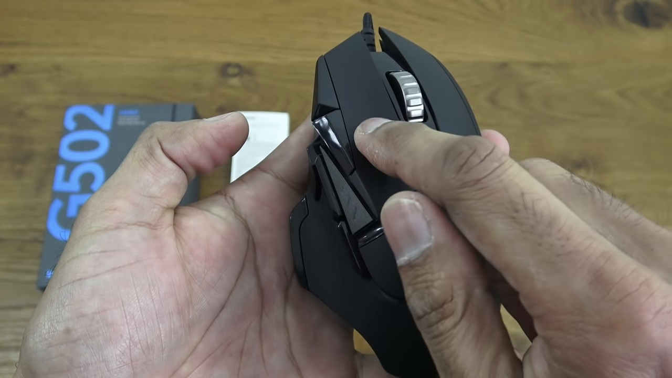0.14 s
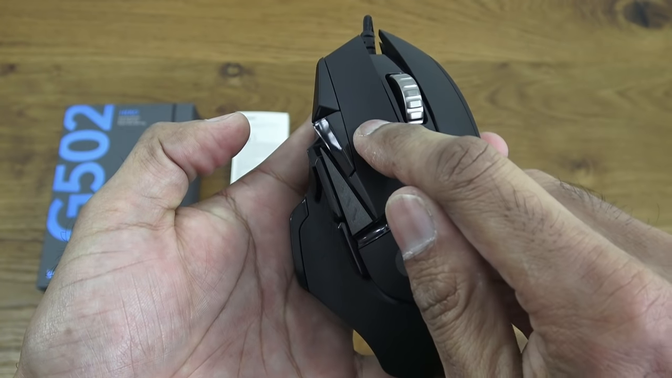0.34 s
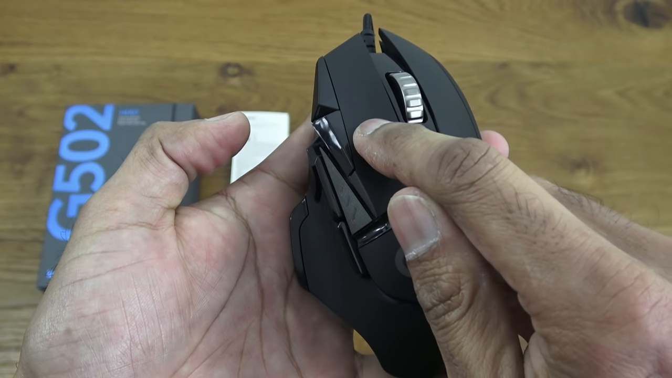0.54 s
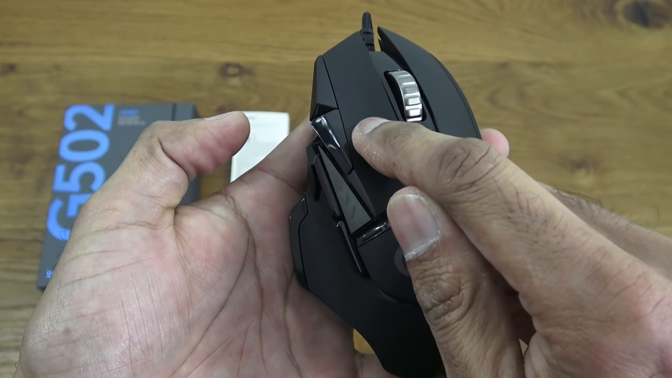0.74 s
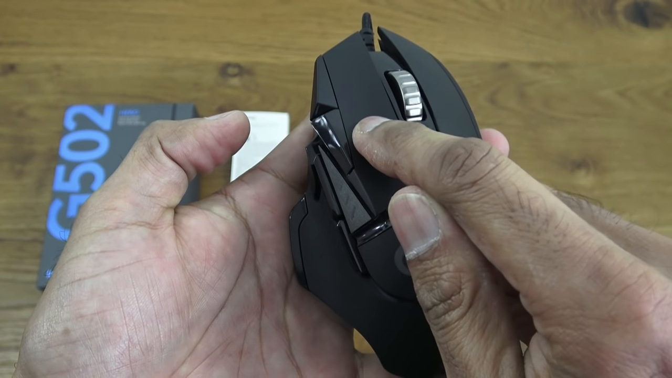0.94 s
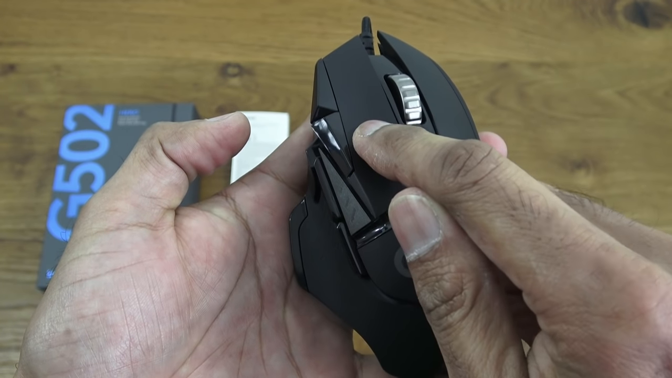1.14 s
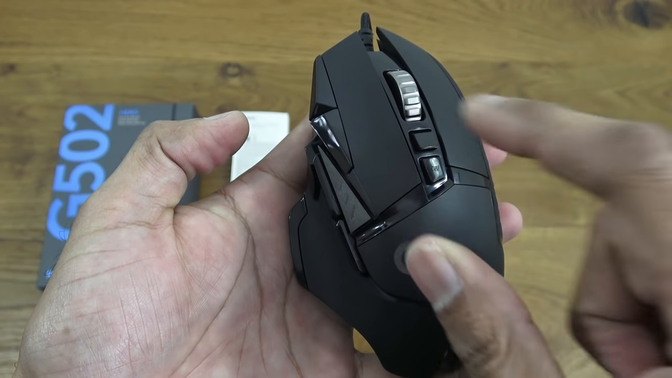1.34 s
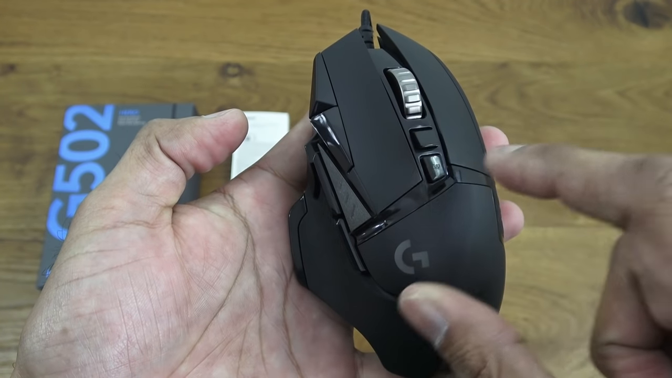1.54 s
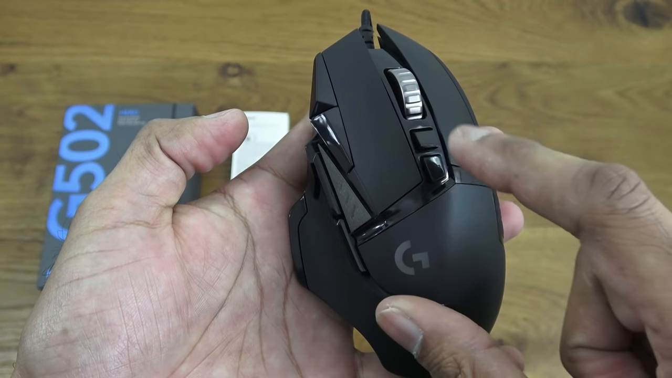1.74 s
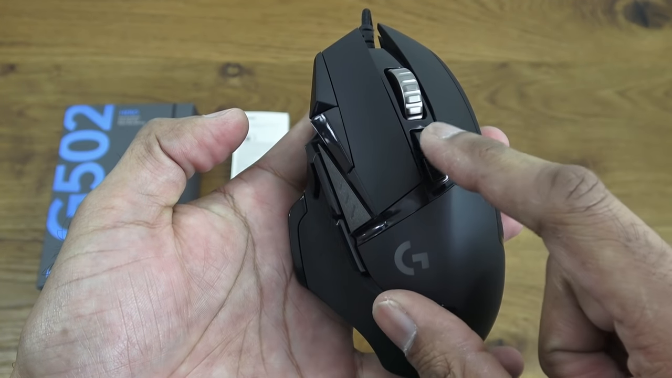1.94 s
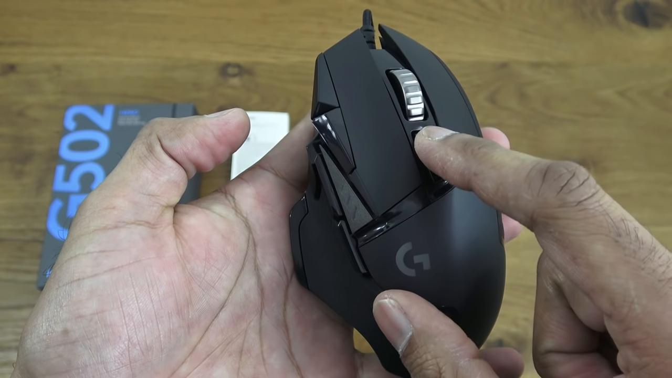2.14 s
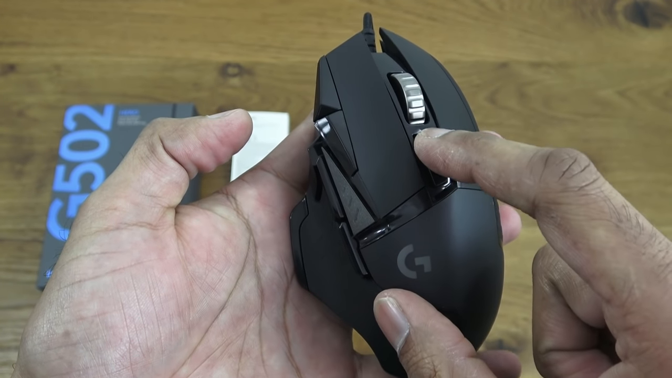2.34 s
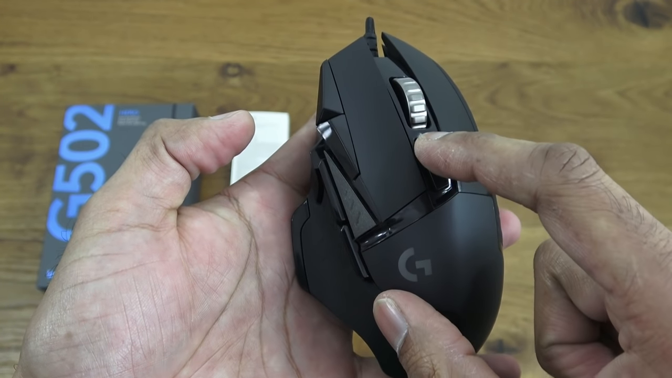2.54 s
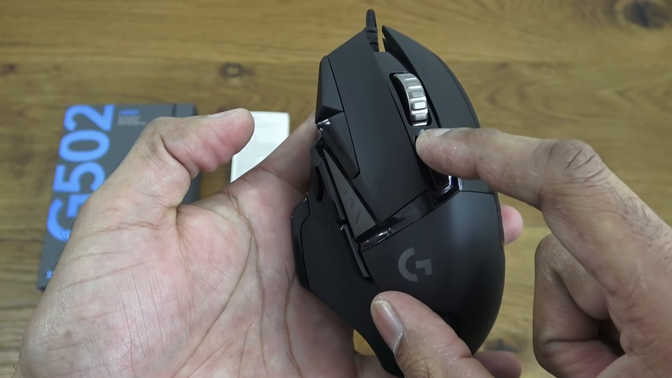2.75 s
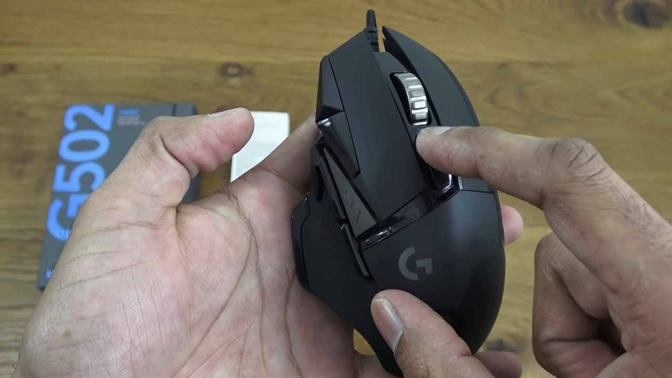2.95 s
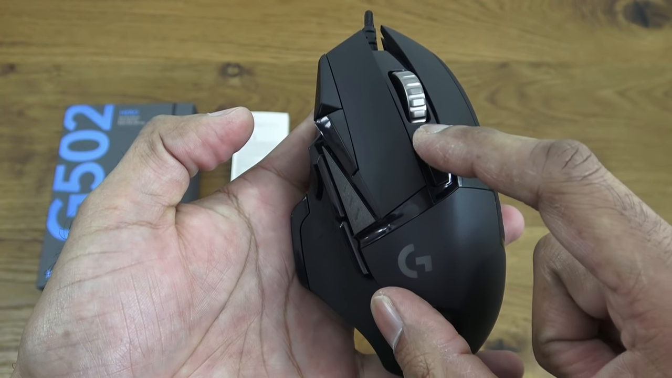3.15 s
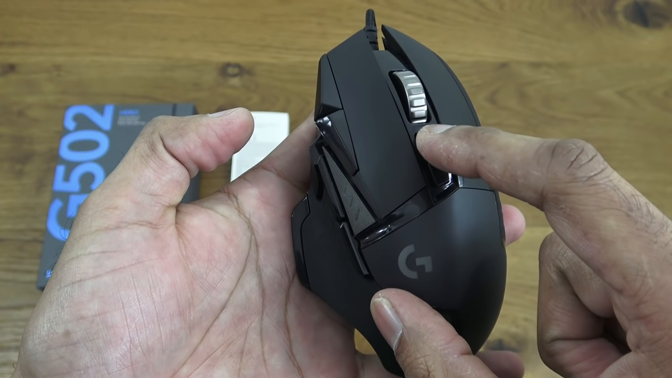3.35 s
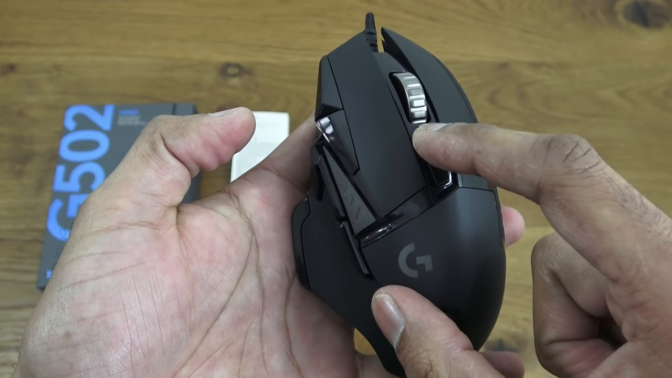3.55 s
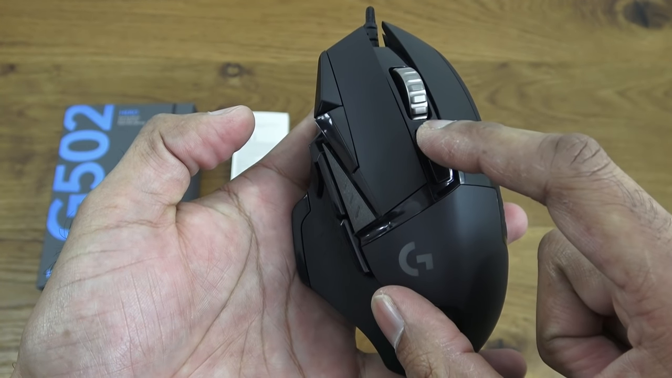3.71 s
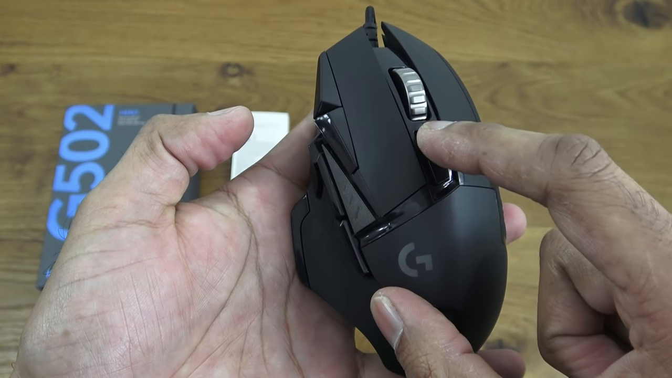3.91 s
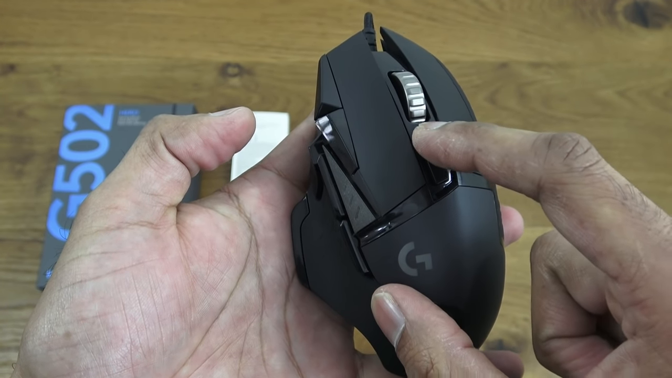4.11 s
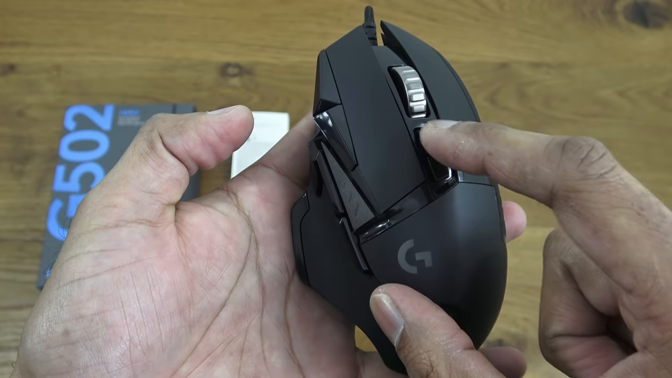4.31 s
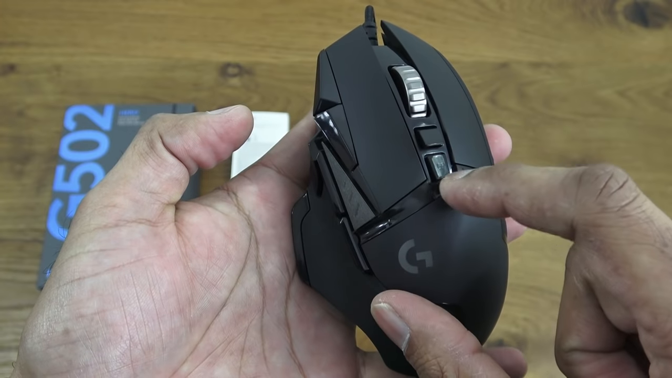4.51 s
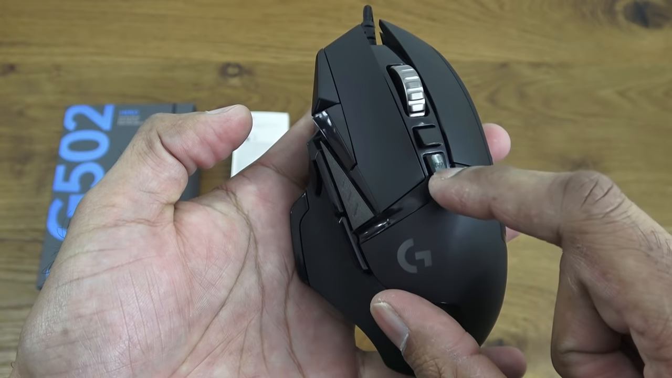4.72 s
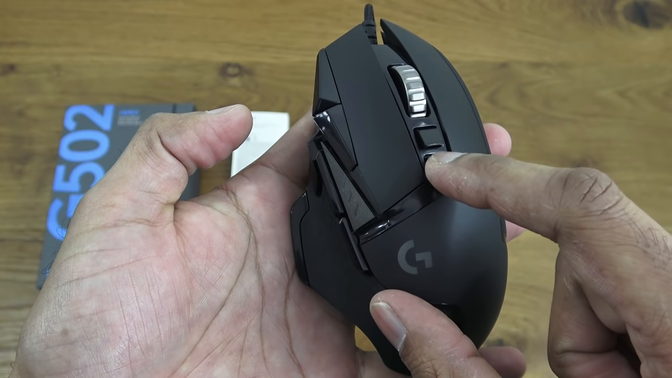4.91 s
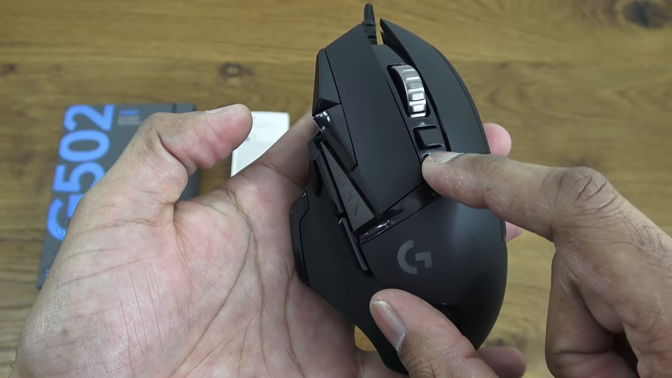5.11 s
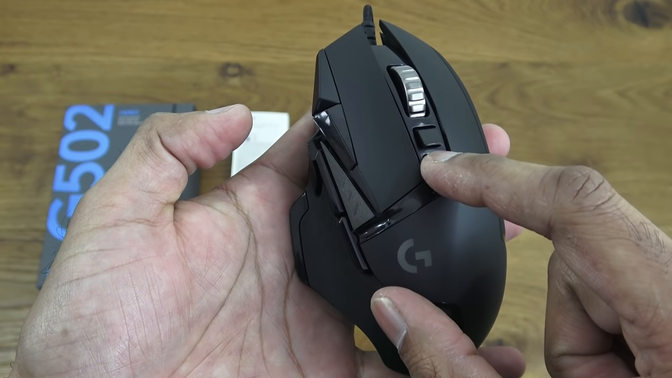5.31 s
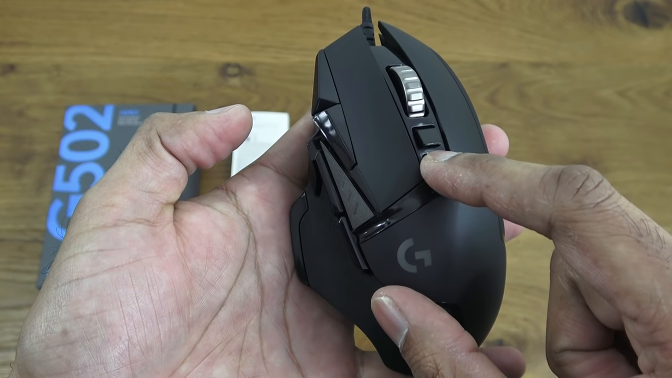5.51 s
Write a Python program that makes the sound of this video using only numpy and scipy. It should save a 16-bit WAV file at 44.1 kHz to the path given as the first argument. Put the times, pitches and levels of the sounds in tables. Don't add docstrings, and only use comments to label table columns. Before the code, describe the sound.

Close, dry mouse clicks: four quick bright double ticks, a pause, then spaced louder plastic clacks with low hollow ring, and a final light click.

```python
import sys
import numpy as np
from scipy import signal
from scipy.fft import rfft, irfft
from scipy.io import wavfile
from scipy.ndimage import uniform_filter1d

SR = 44100
rng = np.random.default_rng(int(sys.argv[2]) if len(sys.argv) > 2 else 0)


def makeup_ratio(level_db):
    decades = np.asarray(level_db, float) / 20
    return 10 ** decades


def wav_record(signal):
    frames = np.transpose(np.atleast_2d(signal))
    bounded = np.clip(frames, -1, 1)
    quanta = np.round(bounded * 32767).astype(np.int16)
    wavfile.write(sys.argv[1], SR, quanta)


N = 245637

# start_s, snap_db, shell_knock_db (re snap)
SIDE_DOWN = [
    (0.3064, -23.5, -41),
    (0.5673, -22, -40),
    (0.8062, -23, -37),
    (1.0251, -22, -41.5),
]
# start_s, snap_db, shell_knock_db (re snap)
SIDE_UP = [
    (0.4178, -18.5, -45),
    (0.6646, -17, -46),
    (0.8926, -17.5, -42.5),
    (1.1195, -18, -41.5),
]
# start_s, snap_db, shell_knock_db (re snap)
LAST_SWITCH = [
    (5.2936, -25, -26),
]
# start_s, snap_db, shell_hz, shell_db (re snap), overtone_db (re snap)
CATCH = [
    (2.4593, -11, 1116, -5, -19),
    (3.0211, -12.5, 1086, -9, -15),
    (4.0659, -11.5, 1101, -8, -14.5),
]
# start_s, snap_db, shell_hz, shell_db (re snap), overtone_db (re snap)
SPRING = [
    (3.2130, -6.5, 1169, -17, -29),
]
# start_s, snap_db, shell_hz, shell_db (re snap), overtone_db (re snap)
KICK = [
    (4.2680, -8.5, 1268, -13.5, -29),
]
# start_s, snap_db, shell_hz, shell_db (re snap), overtone_db (re snap)
PUSH = [
    (3.483, -11.5, 1080, -6, -22.5),
]
# start_s, snap_db, shell_hz, shell_db (re snap), overtone_db (re snap)
PRESS = [
    (3.8359, -15, 1132, -5.5, -20.5),
]
# start_s, snap_db, shell_hz, shell_db (re snap), overtone_db (re snap)
LIFT = [
    (2.8443, -15.5, 1142, -14, -16),
]
# start_s, snap_db, shell_db (re snap), overtone_db (re snap), crackle_hz
SLACK = [
    (2.599, -48.5, -4, -30.5, 4550),
    (2.8047, -46.5, -8.5, -29, 5700),
    (2.821, -60.5, 6, -8, 2400),
    (2.831, -49.5, -1, -10.5, 5500),
    (2.9587, -32.5, 3, -19, 4900),
    (3.381, -47.5, -4, -12.5, 10500),
    (3.630, -54, 14, -18.5, 4000),
    (3.6414, -40.5, -3, -10.5, 5030),
    (3.7085, -51, -10, -14, 5640),
    (4.013, -36, 3, -14, 4700),
]


def evened(x):
    return x / np.sqrt(np.mean(x ** 2) + 1e-20)


def read(points, hz):
    point_hz, value = np.transpose(points)
    return np.interp(np.log(hz + 1), np.log(point_hz + 1), value)


def add(mix, start_s, sound):
    part = mix[..., round(start_s * SR):][..., :sound.shape[-1]]
    part += sound[..., :part.shape[-1]]


def ring(x, modes, bare_db, tilt_db=0):
    f = np.fft.rfftfreq(len(x), 1 / SR)
    response = makeup_ratio(bare_db) + 0j
    for k, (hz, width_hz, db) in enumerate(modes):
        response = response + (-1) ** k * makeup_ratio(db) / (1 + 2j * (f - hz) / max(width_hz, 130))
    tilt = makeup_ratio(tilt_db * np.log2((f + 2000) / 9000))
    low_cut = (1j * f / (2200 + 1j * f)) ** 2
    return irfft(rfft(x) * response * tilt * low_cut, len(x))


def snap(db, modes, bare_db, crack_s, rattle_db, rattle_s, tilt_db=0):
    t = np.arange(4096) / SR
    shape = np.exp(-(t / crack_s) ** 2) + makeup_ratio(rattle_db - 60 * t / rattle_s)
    shape *= np.minimum(t / 0.00037, 1)
    energy = np.linalg.norm(shape)
    chatter = rfft(rng.standard_normal(len(t)) * shape)
    chatter /= np.sqrt(uniform_filter1d(abs(chatter) ** 2, size=50))
    chatter = irfft(chatter) * (t < .07)
    sound = ring(chatter * energy / np.linalg.norm(chatter), modes, bare_db, tilt_db)
    spread = ring(energy * (t == 0), modes, bare_db, tilt_db)
    peak = np.sqrt(uniform_filter1d(sound ** 2, size=64).max())
    return makeup_ratio(db - 8.5) * np.array([sound, sound, spread]) / peak


def mode(hz, db, t60_s, rise_s):
    t = np.arange(8192) / SR
    swell = 1 - np.exp(-(t / rise_s) ** 2)
    return makeup_ratio(db - 60 * t / t60_s) * swell * np.sin(2 * np.pi * (hz * t + rng.random()))


def shell(hz, db, over_db, side_db=0):
    # pitch_hz, level_db, t60_s
    neighbours = [(1373, -2.5, 0.02), (1505, -16.5, 0.051), (924, -16, .04), (773, -16, 0.013),
                  (1838, -13, 0.016)]
    body = mode(hz, db + 10.5, 0.016, .0028)
    for side_hz, level_db, t60_s in neighbours:
        body = body + mode(side_hz, db + level_db + side_db, t60_s, 0.0016)
    thump = mode(300, db - 20.5, 0.015, 0.001465)
    over = mode(2228, over_db + 7.0, 0.036, 0.0012) + mode(2810, over_db + 0.5, 0.0087, 0.00033)
    return (body + thump) * makeup_ratio([[0], [-9.], [-5.5]]) + over * makeup_ratio([[0], [-10], [-10]])


def noise_floor():
    # pitch_hz, level_db
    floor_colour = [(12, -9.5), (40, -12), (107, -23), (345, -25), (1100, -30.5), (2700, -37), (7400, -37),
                    (15900, -41.5)]
    # pitch_hz, width_hz, level_db
    humps = [(20, 9, -7), (70, 25.2, -9.5), (195, 33.6, -16.5), (312.6, 25, -26)]
    frames, hz = N // 512 + 5, np.fft.rfftfreq(2048, 1 / SR)
    a, b = rng.standard_normal((frames, len(hz), 2)).T
    lumps = evened(uniform_filter1d(rng.standard_normal(frames), 8))
    colour = makeup_ratio(read(floor_colour, hz))
    for hump_hz, width_hz, db in humps:
        colour = colour + makeup_ratio(db) * np.exp(-((hz - hump_hz) / width_hz) ** 2)
    heave = makeup_ratio(4.8 * lumps / (1 + (hz[:, None] / 45) ** 2))
    z = (a + 1j * b) * colour[:, None] * heave
    floor_db = -59
    return makeup_ratio(floor_db) * evened(signal.istft(z, nperseg=2048, noverlap=1536)[1][:N])


def finger_slide():
    # start_s, length_s, peak_db
    strokes = [
        (0.0, .16, -75),
        (1.198, 0.066, -65),
        (1.228, 0.35, -66.5),
    ]
    fastest = 0.29
    out = np.zeros(N)
    for start_s, length_s, db in strokes:
        u = np.arange(0, length_s, 1 / SR) / length_s
        bursts = makeup_ratio(2.0 * np.minimum(rng.exponential(1, len(u)), 4))
        grains = rng.standard_normal(len(u)) * bursts
        hiss = evened(ring(grains, [(10140, 3200, 0.01)], -15))
        speed = np.sin(np.pi / 2 * np.interp(u, [0, fastest, 1], [0, 1, 0]))
        add(out, start_s, makeup_ratio(db) * hiss * speed)
    return out


def soft_touches():
    # start_s, snap_db, shell_db (re snap), overtone_db (re snap), crackle_hz
    landing = [
        (.2865, -46.5, -2, -13, 2520),
    ]
    # start_s, snap_db, shell_db (re snap), overtone_db (re snap), crackle_hz
    taps = [
        (.3002, -42, -28, -38, 11000),
        (1.1965, -57, -4.5, -8, 2500),
        (1.485, -55, -17, -20, 8000),
        (4.334, -37, 3, -2, 2800),
    ]
    # pitch_hz, width_hz, level_db
    landing_ring = [(2520, 320, 4), (10500, 2100, -7)]
    # (touches, main shell pitch Hz, side modes dB)
    for_each = [(landing, 400, -15), (taps, 990, -3), (SLACK, 1030, 4)]
    out = np.zeros((3, N))
    for rows, hz, side_db in for_each:
        for start_s, db, shell_db, over_db, crackle_hz in rows:
            bare_db = -17 + .45 * (db + 42) + (crackle_hz - 5000) / 500
            modes = landing_ring if rows is landing else [(crackle_hz, 1100, 0)]
            add(out, start_s, snap(db, modes, min(bare_db, -8), 0.0011, -7, .035))
            add(out, start_s, shell(hz, db + shell_db, db + over_db, side_db))
    for start_s, db, shell_db, *_ in taps:
        add(out[0], start_s, mode(906, db + shell_db - 2.5, 0.19, 0.0013))
    return out


def switches():
    # pitch_hz, width_hz, level_db
    down_ring = [(4090, 320, -9), (5440, 220, -6.5), (5800, 250, -4), (6200, 830, -7.5), (9130, 400, 4.5),
                 (9880, 310, 6), (10400, 320, 6.5), (11400, 300, -1), (13300, 610, -9)]
    # pitch_hz, width_hz, level_db
    up_ring = [(3520, 370, 2), (3800, 380, 5), (6400, 170, 7.5), (8300, 160, -5), (9890, 670, 17.5),
               (10690, 240, 13.5), (10680, 300, 9.5), (12400, 250, 2), (13700, 570, -6)]
    # pitch_hz, width_hz, level_db
    last_ring = [(3810, 280, -4.5), (6900, 300, 2), (8220, 220, 6), (11000, 340, 9), (12900, 300, 0)]
    # (ticks, ringing, bare dB, crack s, rattle dB)
    kinds = [(SIDE_DOWN, down_ring, -24, .0012, -9),
             (SIDE_UP, up_ring, -24, .001, -9),
             (LAST_SWITCH, last_ring, -11, .0012, -12)]
    out = np.zeros((3, N))
    for rows, modes, bare_db, crack_s, rattle_db in kinds:
        for start_s, db, knock_db in rows:
            add(out, start_s - .0004, snap(db, modes, bare_db, crack_s, rattle_db, 0.034))
            add(out, start_s - .0004, shell(1073, db + knock_db + 5.0, db + knock_db - 7.5))
    return out


def wheel_latch():
    # pitch_hz, width_hz, level_db
    catch_ring = [(2840, 520, -6), (3800, 450, -3.5), (6040, 560, -4.5), (7770, 590, -2), (9470, 950, -8),
                  (12500, 770, -8.5)]
    # pitch_hz, width_hz, level_db
    spring_ring = [(3200, 2300, -17.5), (5225, 320, -1), (7490, 1200, -1), (8500, 1000, 2),
                   (10500, 900, -0.5), (12200, 1600, -1.5), (13600, 890, -4)]
    # pitch_hz, width_hz, level_db
    kick_ring = [(2860, 700, -6.5), (4375, 380, -1.5), (5700, 660, 1), (8000, 500, 2), (10320, 720, 0.5),
                 (11700, 500, 3.5), (12300, 1200, -3), (14500, 1800, -4.5)]
    # pitch_hz, width_hz, level_db
    push_ring = [(3500, 5400, -6.5), (5450, 240, 2), (6740, 650, -6.5), (8500, 380, 4), (9700, 1120, -7),
                 (12840, 930, -2)]
    # pitch_hz, width_hz, level_db
    press_ring = [(2930, 450, -11), (4700, 170, 2), (6320, 390, -8.5), (7930, 430, 2), (10100, 800, -6.5),
                  (12500, 1200, -8.5)]
    # pitch_hz, width_hz, level_db
    lift_ring = [(3560, 1600, -16), (4840, 1400, -1.5), (6260, 200, 13), (8220, 1200, 2), (10500, 900, 3.5),
                 (12300, 2400, -1)]
    creep_s, creep_db = 0.0014, -16
    catch_dulling, even_overtone_db = -1.5, -16.5
    # (strokes, ringing, bare dB, crack s, rattle dB, side modes dB, dulling)
    kinds = [(CATCH, catch_ring, -14, .0012, -16, -1.5, catch_dulling),
             (SPRING, spring_ring, -14, .0012, -14, 2.5, 0),
             (KICK, kick_ring, -14, .0011, -15, 3, 0),
             (PUSH, push_ring, -14, .0012, -16, -4, 0),
             (PRESS, press_ring, -14, .0012, -16, -1.5, 0),
             (LIFT, lift_ring, -16, .0012, -15, 5, 0)]
    out = np.zeros((3, N))
    for rows, modes, bare_db, crack_s, rattle_db, side_db, dulling in kinds:
        for start_s, db, hz, shell_db, over_db in rows:
            tilt_db = dulling * (over_db - even_overtone_db)
            add(out, start_s - creep_s, snap(db + creep_db, modes, bare_db, creep_s, -26, .01))
            add(out, start_s - .0003, snap(db, modes, bare_db, crack_s, rattle_db, 0.018, tilt_db))
            add(out, start_s - .0003, shell(hz, db + shell_db + 3.5, db + over_db, side_db))
    return out


def room(near, far):
    # delay_s, level_db
    echo_rows = [(.0012, -7.5), (.0035, -7), (.006, -11), (.009, -19.5), (.0125, -16), (.019, -27)]
    # pitch_hz, t60_s
    decay = [(300, 0.36), (1000, 0.36), (2500, 0.44), (6000, 0.28), (10000, 0.31), (15000, 0.15)]
    echoes = np.zeros(SR // 20)
    for k, (delay_s, db) in enumerate(echo_rows):
        add(echoes, delay_s, (-1) ** k * makeup_ratio([db]))
    out = signal.fftconvolve(near, echoes)[:N]
    for place in range(3):
        reflections = np.zeros(SR // 2)
        at = np.arange(300, len(reflections) - 20, 20)
        reflections[at + rng.integers(0, 20, len(at))] = rng.choice([-1., 1.], len(at))
        hz, t, z = signal.stft(reflections, SR, nperseg=256)
        fade = makeup_ratio(-60 * t / read(decay, hz)[:, None])
        tail = signal.istft(z * fade, SR, nperseg=256)[1]
        share = np.sqrt(2 / 3) * np.cos(2 * np.pi * (np.arange(N) / SR * 1.3 + place / 3))
        out += makeup_ratio(-6.5) * signal.fftconvolve(far * share, tail / np.linalg.norm(tail))[:N]
    return out


def scene():
    direct, near, far = finger_slide() + soft_touches() + switches() + wheel_latch()
    return (direct + room(near, far) + noise_floor())[None]


def starve(x):
    frame_s, block_s, grid_s = 1024 / 48000, 128 / 48000, .008
    hz, t, z = signal.stft(x, SR, nperseg=128, noverlap=96)
    power = uniform_filter1d(abs(z) ** 2, size=5, axis=0)
    level_db = 10 * np.log10(uniform_filter1d(power, size=3, axis=1) + 1e-16)
    scatter = np.exp(2j * np.pi * rng.random(z.shape))
    sudden = np.zeros(N)
    strokes = SIDE_DOWN + SIDE_UP + LAST_SWITCH + CATCH + SPRING + KICK + PUSH + PRESS + LIFT + SLACK
    for start_s, db, *_ in strokes:
        if db <= -37:
            continue
        frame = grid_s + (start_s - .0006 - grid_s) // frame_s * frame_s
        block = grid_s + (start_s - .0026 - grid_s) // block_s * block_s
        threshold_db = -72 + .4 * db + 3.5 * np.log2(hz[:, None] / 2500 + .1)
        before = (t > frame) & (t < block + .001)
        faint = (level_db < threshold_db) & (hz[:, None] > 700) & before
        attack = abs(z[:, (t > start_s) & (t < start_s + .003)]).mean(1, keepdims=True)
        smear = makeup_ratio(-26.5) * attack * scatter * ((t > block + .001) & (t < start_s))
        z = np.where(faint, z / 1000, z) + smear
        add(sudden, block, np.ones(round(4 * block_s * SR)))
    x = signal.istft(z, SR, nperseg=128, noverlap=96)[1][:N]
    sudden = x * uniform_filter1d(np.minimum(sudden, 1), size=128)
    steady_top_hz = 15900
    top_cut = np.clip((steady_top_hz + 100 - np.fft.rfftfreq(N, 1 / SR)) / 200, 0, 1)
    return sudden + irfft(rfft(x - sudden) * top_cut, N)


def roll_off(x):
    return signal.sosfilt(signal.butter(12, 17000, fs=SR, output="sos"), x)


def record(dry):
    # pitch_hz, level_db
    mic = [(12000, 1.39), (14000, -0.5), (15800, -5), (16400, -18.5), (16900, -50)]
    hz = np.fft.rfftfreq(N, 1 / SR)
    heard = irfft(rfft(dry[0]) * makeup_ratio(read(mic, hz)), N)
    mix = starve(heard)[None]
    return roll_off(mix)


dry = scene()
out = record(dry)
wav_record(out)
```